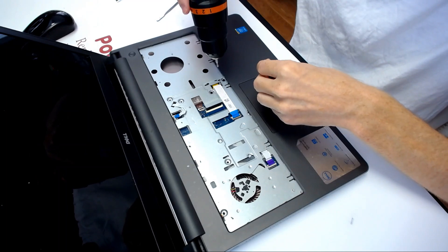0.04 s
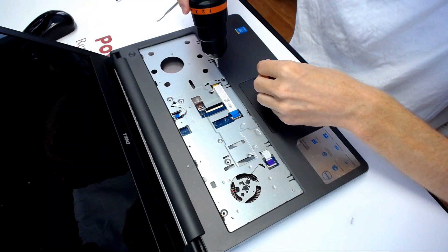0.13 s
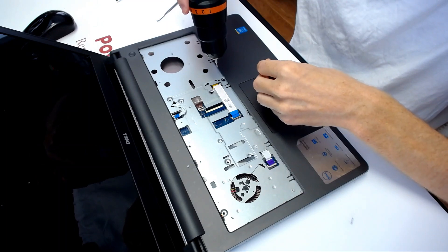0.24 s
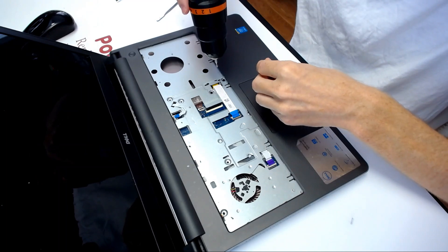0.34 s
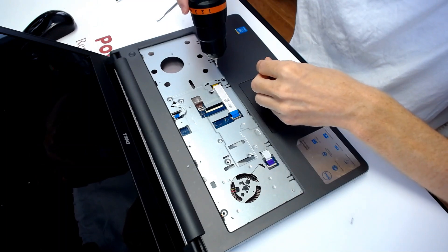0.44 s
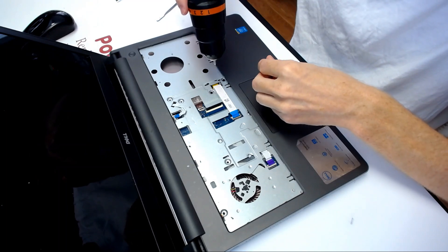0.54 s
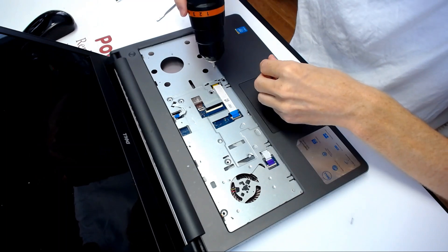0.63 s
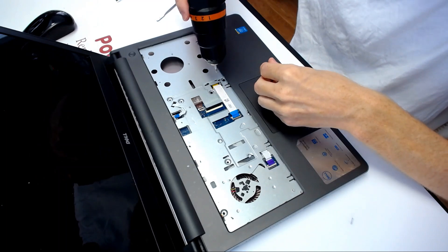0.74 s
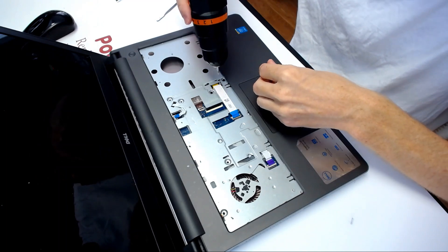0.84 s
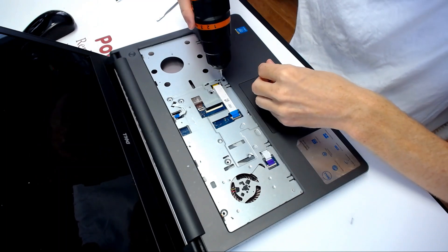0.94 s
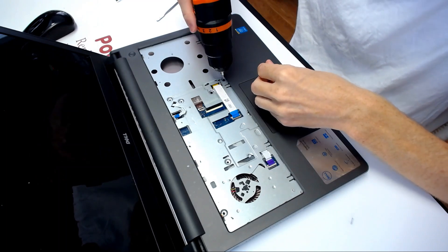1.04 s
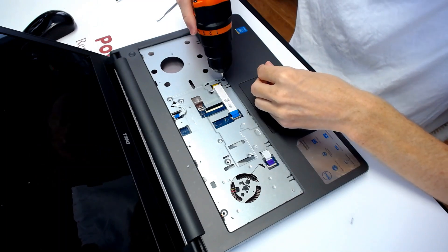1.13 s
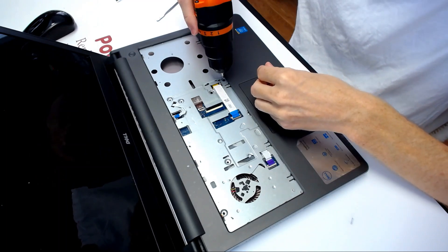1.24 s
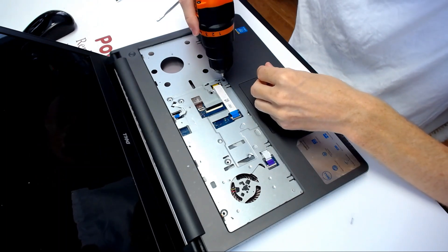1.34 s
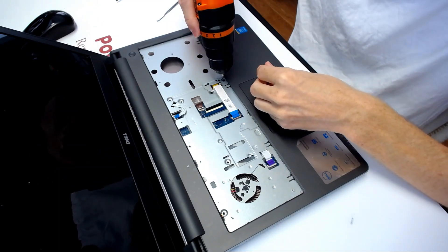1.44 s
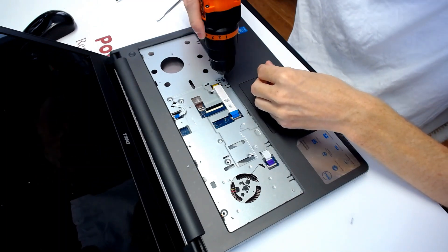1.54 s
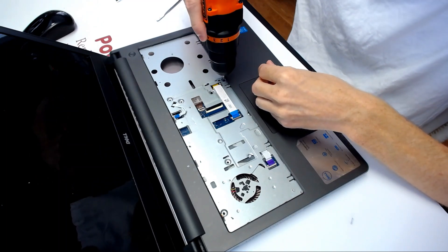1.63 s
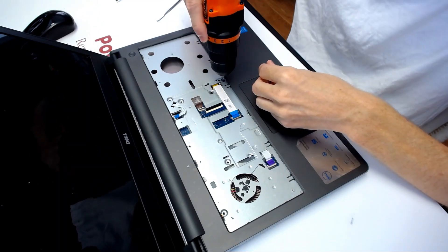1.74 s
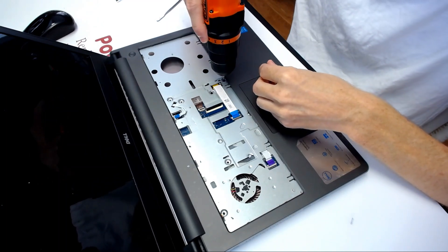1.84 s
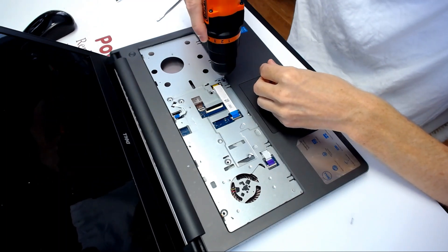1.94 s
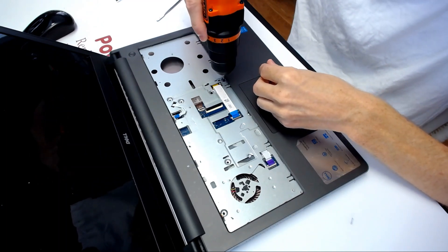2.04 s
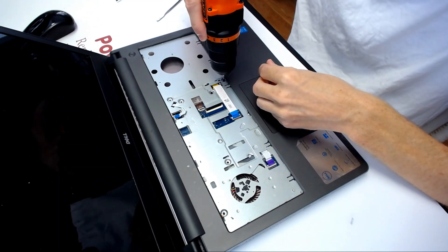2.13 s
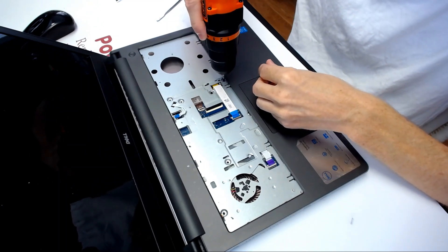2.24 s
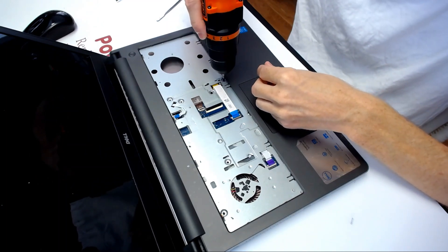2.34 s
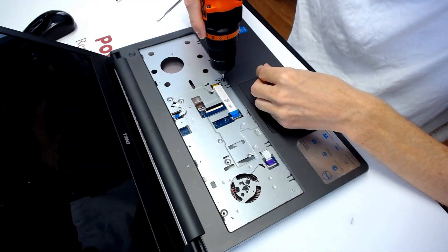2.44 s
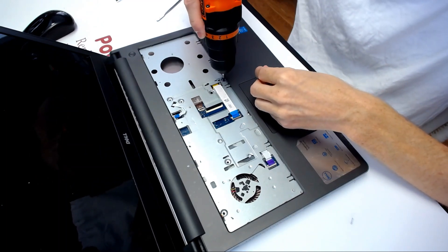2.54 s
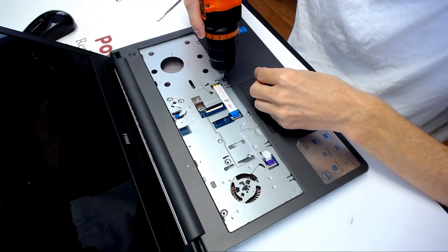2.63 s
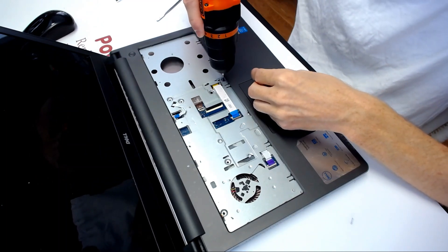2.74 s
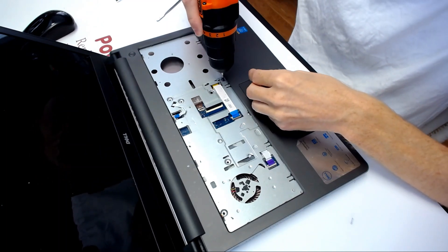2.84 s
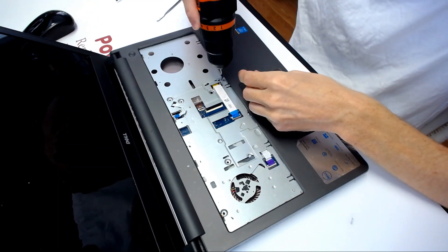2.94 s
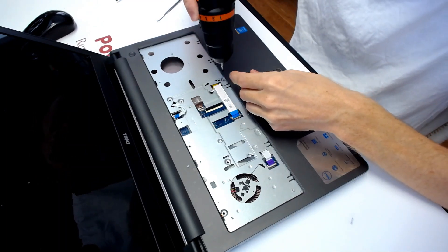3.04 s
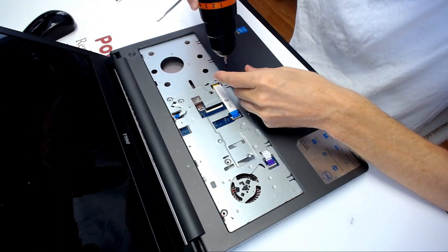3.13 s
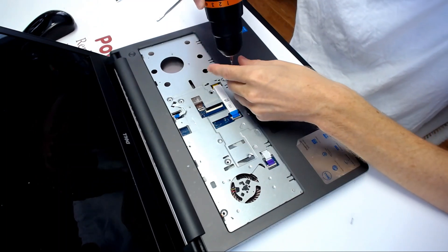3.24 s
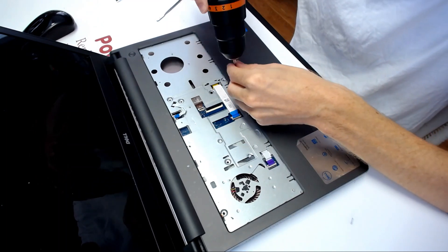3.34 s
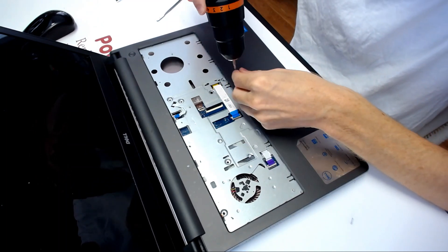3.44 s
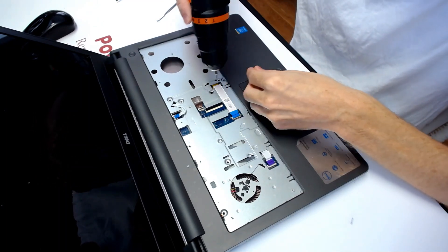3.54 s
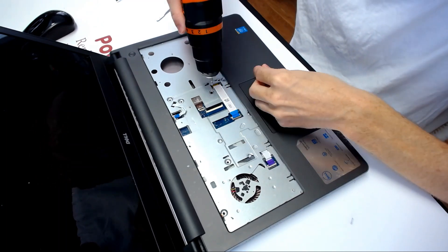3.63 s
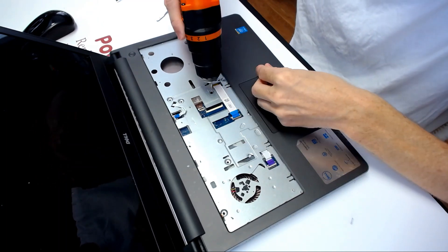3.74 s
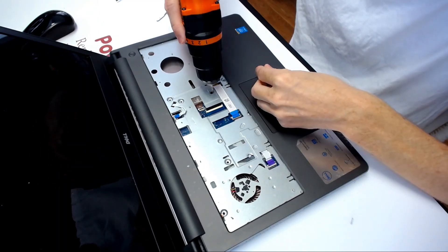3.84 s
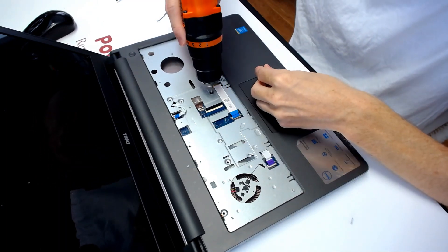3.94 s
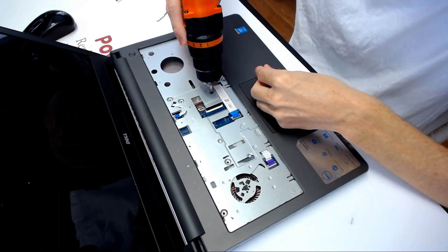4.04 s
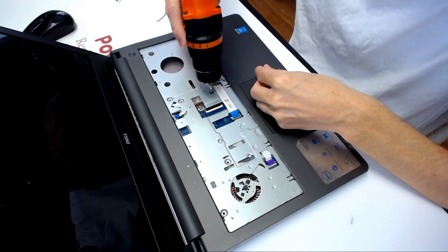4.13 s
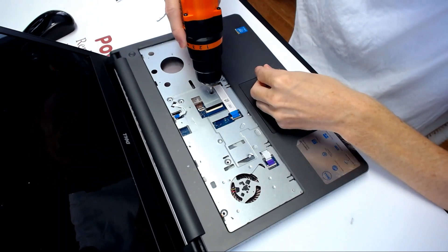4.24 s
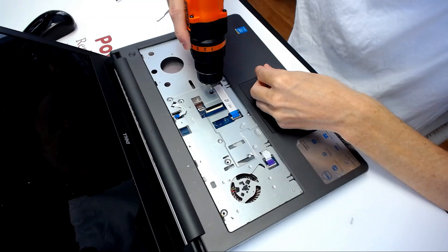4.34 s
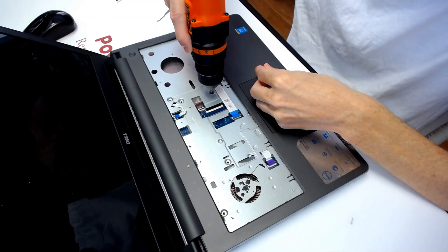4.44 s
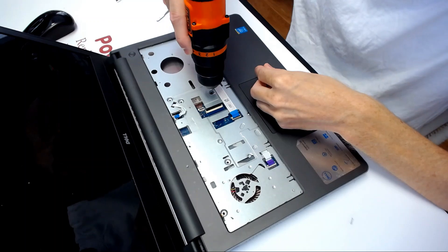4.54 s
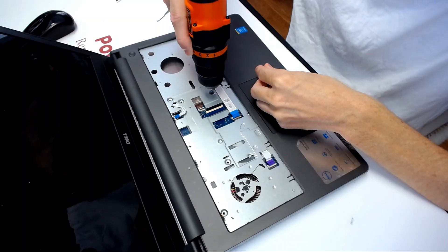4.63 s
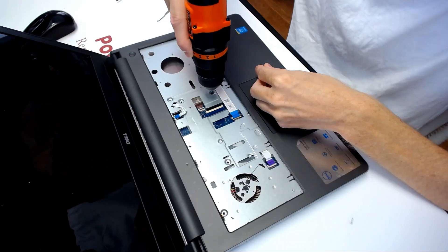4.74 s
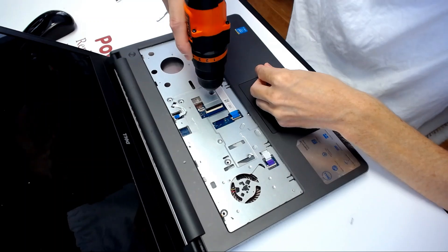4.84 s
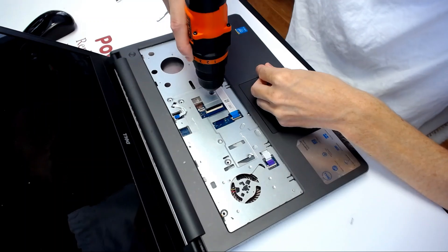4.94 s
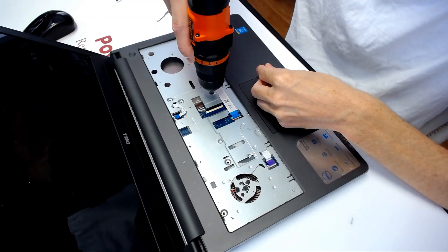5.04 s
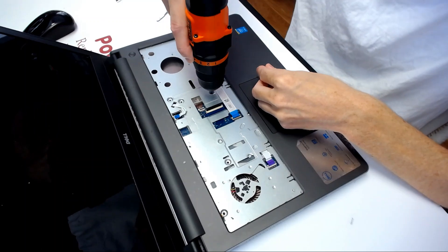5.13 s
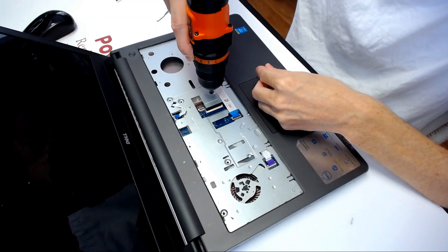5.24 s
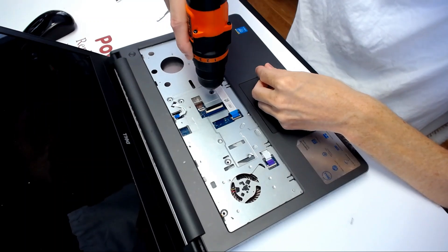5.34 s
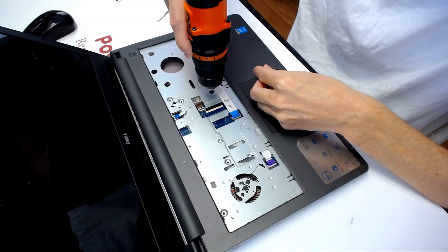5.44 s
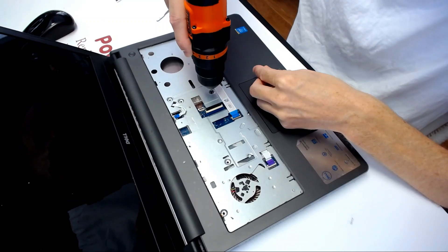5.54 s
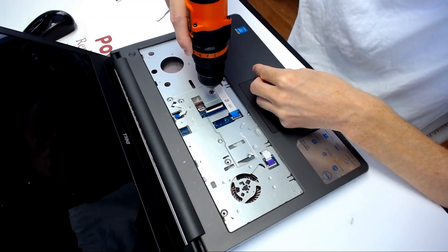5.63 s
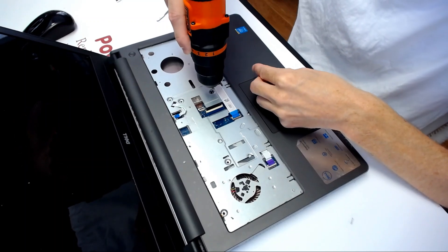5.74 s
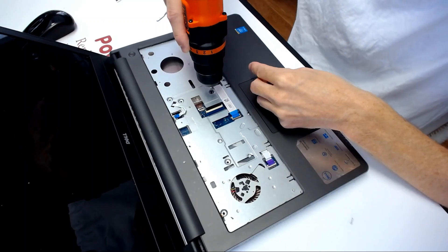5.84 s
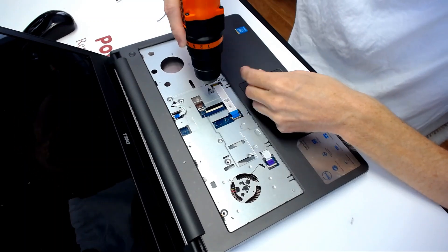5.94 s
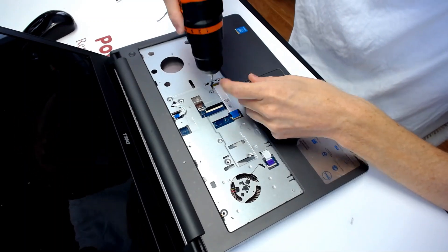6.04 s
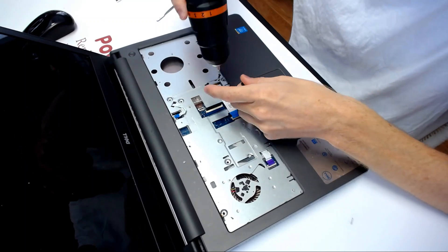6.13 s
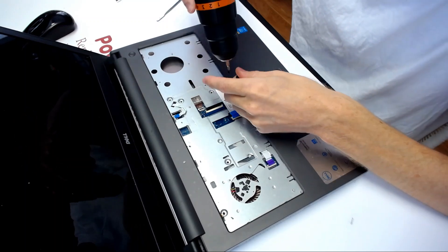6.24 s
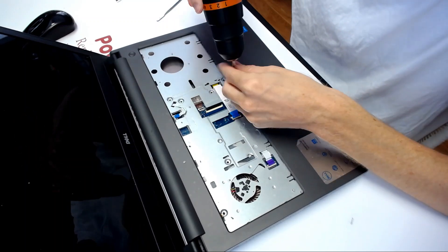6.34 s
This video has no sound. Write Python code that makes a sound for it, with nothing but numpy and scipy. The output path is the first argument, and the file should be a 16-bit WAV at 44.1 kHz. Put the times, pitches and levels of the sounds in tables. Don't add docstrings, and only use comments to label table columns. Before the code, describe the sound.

Close, quiet room: a bit knocks on sheet metal, a drill whirs and coasts down, then restarts with a harsh rapid clatter before whining smoothly.

```python
import sys
import numpy as np
from scipy import signal
from scipy.fft import rfft, irfft, next_fast_len
from scipy.io import wavfile
from scipy.ndimage import uniform_filter1d

SR = 44100
rng = np.random.default_rng(int(sys.argv[2]) if len(sys.argv) > 2 else 0)


def waveform_to_disk(signal):
    frames = np.transpose(np.atleast_2d(signal))
    scaled = np.clip(frames, -1, 1) * 32767
    samples = np.round(scaled).astype(np.int16)
    wavfile.write(sys.argv[1], SR, samples)


def ratio(d):
    e = np.asarray(d, float) / 20
    return 10 ** e


N = 281799
T = np.arange(N) / SR
SIZE = next_fast_len(N + SR)
HZ = np.maximum(np.arange(SIZE // 2 + 1) * SR / SIZE, 1)

# rotor starts in s, released in s, top speed in Hz, spin-up time in s.
PULLS = [
    (1.558, 3.006, 403.4, .117),
    (4.35, 6.019, 406.2, .085),
]
# time in s, peak in dB.
TRIGGER = [
    (1.588, -22.5),
    (4.37, -22.5),
]
# time in s, level in dB.
BITE = [(1.642, -70), (1.65, -28), (1.67, -25), (1.68, -70)]
# time in s, share 0 to 1.
JUMPING = [(4.53, 0), (4.56, 1), (4.885, 1), (4.9, 0)]
# centre in Hz, width in Hz, level in dB.
FRAME = [(271, 61, -4), (387, 12.7, 1.5), (607, 200, -7), (789, 43.5, 5.5), (901, 131, 0), (1340, 193, 1),
         (1439, 108, 3), (1730, 143, 3), (1879, 98, 4.5), (2460, 700, -1), (2920, 140, -11),
         (3480, 98, -14)]


def rms_one(x):
    return x / np.sqrt(np.mean(x ** 2) + 1e-20)


def to_db(gain):
    return 20 * np.log10(gain + 1e-9)


def over_time(points):
    return np.interp(T, *np.transpose(points))


def at_hz(points, hz=HZ):
    points = np.array(points)
    return np.interp(np.log(hz), np.log(points[:, 0]), points[:, 1])


def through(x, response):
    return irfft(rfft(x, SIZE) * response, SIZE)[..., :N]


def resonances(peaks):
    total = 0
    for k, (hz, width, db) in enumerate(peaks):
        damping = 1j * HZ * width
        total = total + (-1) ** k * ratio(db) * damping / (hz ** 2 - HZ ** 2 + damping)
    return total


def hump(hz, centre, width):
    return 1 / (1 + (2 * (hz - centre) / width) ** 2)


def drift(rate):
    r = np.exp(-80 * np.pi * rate / SR)
    slow = signal.lfilter([1], [1, -2 * r, r * r], rng.standard_normal(N // 40 + 2002))[2000:]
    return np.interp(np.arange(N) / 40, np.arange(len(slow)), rms_one(slow))


def noise_pair():
    return rng.standard_normal((2, N))


def pair(mid, side, response):
    # frequency in Hz, likeness of left and right 0 to 1.
    likeness = [(60, 1), (600, .95), (1600, .75), (3200, .5), (5000, .35), (7500, .75), (11000, .7),
                (15000, .5)]
    alike = np.clip(at_hz(likeness), 0, 1)
    both = through(mid, response * np.sqrt(1 + alike))
    apart = through(side, response * np.sqrt(1 - alike))
    return np.array([both + apart, both - apart]) / np.sqrt(2)


def clicks(times, level_db):
    out = np.zeros(N)
    out[(np.asarray(times) * SR).astype(int)] = ratio(level_db)
    return out


def burst(train, t60, low_hz, high_hz):
    fade = signal.lfilter([1], [1, -ratio(-60 / (t60 * SR))], train + 1e-18)
    band = signal.butter(2, [low_hz, high_hz], "band", fs=SR, output="sos")
    return signal.sosfilt(band, fade * noise_pair())


def air():
    # frequency in Hz, level in dB per Hz.
    noise_colour = [(12, -35), (25, -4), (55, -7.5), (100, -10), (170, -9.5), (320, -11), (570, -17),
                    (1420, -28.5), (1700, -33), (11000, -45), (15000, -37)]
    # frequency in Hz, level in dB.
    hums = [(59.2, -72.5), (156.1, -88.5), (624.5, -79.5), (710.6, -84), (1437, -86), (7192, -102)]
    out = rms_one(pair(*noise_pair(), ratio(at_hz(noise_colour)))) * ratio(-64 + 0.77 * drift(10))
    for hz, db in hums:
        out = out + np.sqrt(2) * ratio(db + 0.5 * drift(4.4)) * np.sin(2 * np.pi * hz * T)
    return out


def room(x):
    t60_s, first_return_s = 0.28, 0.004
    t = T[:SR // 2]
    tail = rng.standard_normal((2, SR // 2)) * ratio(-60 * t / t60_s) * (t > first_return_s)
    tail = tail / np.sqrt(np.sum(tail ** 2, axis=1, keepdims=True))
    return through(x, rfft(tail, SIZE) / (1 + HZ / 5000) * HZ / (HZ + 300))


def knocks():
    # time in s, peak in dB, thud in dB, crack in dB.
    hits_on_frame = [(1.128, -28, -31.5, -49), (1.296, -65, -51, -77), (1.331, -69, -57, -72),
                     (1.46, -71, -70, -74), (1.505, -69, -69.5, -73), (1.622, -15, -25, -42),
                     (1.632, -22, -18.5, -37), (2.511, -31, -45, -25), (2.531, -21.5, -52, -28),
                     (2.689, -25.5, -30.5, -37), (2.712, -27.5, -42, -40), (3.935, -19, -40, -51),
                     (3.985, -34.5, -47, -54), (4.025, -29.5, -67.5, -58.5), (4.109, -37, -41, -72.5),
                     (4.154, -41, -43.5, -62), (5.737, -20, -55, -44), (5.749, -30, -35, -30)]
    s, peak_db, thud_db, crack_db = np.transpose(hits_on_frame)
    hits = clicks(s, peak_db + 10.5)
    blow = np.convolve(hits, np.hanning(24))[:N]
    contact = burst(hits, 0.025, 400, 1500) - blow * [[1], [.3]]
    thud = burst(clicks(s, thud_db + 12), 0.13, 110, 475)
    crack = burst(clicks(s, crack_db + 8.5), 0.028, 1700, 7000)
    switch = burst(clicks(*np.transpose(TRIGGER)), 0.02, 1600, 5950)
    return pair(*contact, ratio(-15.5) + resonances(FRAME)) + pair(*(thud + crack + ratio(8) * switch), 0.94)


def jumps():
    # time in s, peak in dB, crack in dB relative to the peak.
    drops = [(4.452, -8.5, -16), (4.486, -3, -29), (4.501, -7, -8), (4.549, -6.5, -25), (4.571, 0.5, -17),
             (4.579, -6, -9), (4.602, 1, -13.5), (4.622, -4.5, -28), (4.646, -7.5, -21),
             (4.671, -12.5, -29), (4.692, -5, -23), (4.714, -11, -16), (4.737, -25, -21),
             (4.763, -6.5, -13), (4.786, 0, -9.5), (4.81, -1.5, -7), (4.833, -2, -8.5), (4.856, 1, -23),
             (4.879, -2, -6.5), (4.887, -7, -0.5)]
    s, peak_db, bright_db = np.transpose(drops)
    hits = clicks(s, peak_db + 4.5)
    blow = np.convolve(hits, np.hanning(16))[:N]
    contact = burst(hits, 0.022, 300, 3500) - ratio(1) * blow * [[1], [.4]]
    crack = burst(clicks(s, peak_db + bright_db + 3), 0.025, 2500, 7000)
    return pair(*contact, ratio(-15) + resonances(FRAME)) + pair(*crack, 0.94)


def jolted(steady_db, times, peaks_db, fade_db_s):
    dying = signal.lfilter([1], [1, -ratio(-fade_db_s / SR)], clicks(times, peaks_db) + 1e-18)
    return to_db(ratio(steady_db) + dying)


def rub_and_shake(rub_db, rattle_db):
    # time in s, rubbing in dB, bench in dB.
    jolts = [(1.129, -47.5, -47), (1.297, -72, -51), (1.39, -90, -61), (1.619, -33, -37), (2.13, -44, -58),
             (2.512, -31.5, -41), (2.686, -48, -39.5), (3.937, -43.5, -39), (4.109, -60.5, -47.5),
             (4.155, -63, -46.5), (4.9, -26, -38), (5.737, -33.5, -45)]
    s, rub_jolts_db, shake_jolts_db = np.transpose(jolts)
    heavy = np.clip((rub_db + 40) / 10, 0, 1)
    off_screw = rattle_db < -31
    shake_db = rub_db - 18.5 + 18.5 * heavy - 10 * off_screw
    return jolted(rub_db, s, rub_jolts_db, 358), jolted(shake_db, s, shake_jolts_db, 115)


def rubbing(rub_db, shake_db):
    slot_hz, dip_s = 42.7, 4.7525
    slot = 2 * np.pi * slot_hz * (T - dip_s) + 0.071 * drift(22)
    jumping = over_time(JUMPING)
    swell = 1 + 0.45 * jumping * np.cos(slot + 2.3)
    grit = noise_pair() * ratio(2 * drift(47)) * swell
    frame = rms_one(pair(*grit, ratio(-13) / (1 + HZ / 3000) + resonances(FRAME)))
    bench_modes = resonances([(44.8, 61, 3.5), (131, 37, 3)])
    bench = rms_one(pair(*noise_pair(), bench_modes / (1 + (HZ / 300) ** 2)))
    harmonics_db = [3, 0.5, -4.5, -35, -8.5]
    dips = -sum(ratio(db) * np.cos(k * slot) for k, db in enumerate(harmonics_db, start=1))
    shake = (1 - 0.7 * jumping) * bench + jumping * dips
    return ratio(rub_db + 4) * frame + ratio(shake_db - 4.5) * shake


def rotor_speed():
    # from s, until s, sag in Hz, easing time in s.
    loads = [(1.5, 1.678, 17, 0.01606), (4.3, 4.94, 18.5, .36)]
    coast_per_s, friction_hz = 0.68, 296.2
    sag = 0
    for since, until, hz, eases in loads:
        sag = sag + hz * np.exp(-np.maximum(T - until, 0) / eases) * (T > since)
    speed = np.zeros(N)
    for (start, stop, top, rise), (click, _) in zip(PULLS, TRIGGER):
        driven = top * (1 - np.exp(-np.maximum(T - start, 0) / rise)) - sag
        dying = np.exp(-coast_per_s * np.maximum(T - stop, 0))
        coast = (top + friction_hz) * dying - friction_hz
        speed = np.where(T > click - 0.003, np.clip(np.minimum(driven, coast), 0, None), speed)
    return speed


def slowness(speed):
    return np.clip((396 - speed) / 30, 0, 1)


def leaning(speed):
    # time in s, slack at first in dB, then gear rattle, low tones, rubbing in dB.
    leans = [(1.13, 2, -93, -110, -86), (1.588, -1, -38.5, -65, -40.5), (1.613, 10, -20, -38, -29),
             (1.677, 19.5, -24.5, -41, -44.5), (1.897, 3.5, -25.5, -47.5, -52),
             (2.032, 1, -23, -37.5, -49.5), (2.231, 7.5, -24.5, -39.5, -64), (2.38, 0.5, -23.5, -37, -47),
             (2.585, 9, -24, -35, -45.5), (2.7, 1.5, -23.5, -34.5, -41.5), (2.798, 5, -25.5, -37.5, -51.5),
             (2.934, -0.4, -32.5, -44, -50.5), (4.365, 16, -23, -45, -24), (4.505, 1.8, -31, -39, -26),
             (4.549, 3, -23, -33.5, -21), (4.902, 0.3, -26, -52, -40.5), (4.99, 3, -21.5, -46, -38),
             (5.187, 5.5, -22, -45, -49.5), (5.33, 1, -23, -41, -51), (5.429, 1.5, -22.5, -34.5, -43.5),
             (5.733, 10, -28.5, -33, -46), (5.868, 0.8, -32, -43.5, -51)]
    # rotor speed in Hz, rattle in dB, rubbing in dB.
    coasting = [(0.1, -52, -28), (18, -41, -18), (45, -25, -6), (84.2, -17.5, -4), (123, -13, 0.5),
                (195, -12.5, -7), (310, -6.5, -1.5), (393, 0.2, 0.5)]
    rows = np.vstack([(0, 0, -120, -120, -120), leans])
    s, slack, rattle, tone, rub = rows[np.searchsorted(rows[:, 0], T, side="right") - 1].T
    next_pulls = [TRIGGER[1][0] - 0.003, T[-1] + 1]
    free = sum((T > stop) & (T < later) for (_, stop, *_), later in zip(PULLS, next_pulls))
    hz, *fades = np.transpose(coasting)
    fade, rub_fade = (free * np.interp(speed, hz, f) for f in fades)
    loose = slack * np.exp((s - T) / 0.047)
    tone_loose = 1.36 * slack * np.exp((s - T) / 0.13)
    levels = [rattle - loose + fade, tone - tone_loose + 3.24 * fade, rub - 1.43 * loose + rub_fade]
    return uniform_filter1d(levels, size=440, axis=1)


def screw_wobble():
    start, crest, stop, beats_per_s = 4.988, 5.025, 5.185, 14.3
    fading = ratio(-28 - 27 * (T - start).clip(0)) * ((T > start) & (T < stop))
    return fading * np.clip(0.83 + np.cos(2 * np.pi * beats_per_s * (T - crest)), 0.05, 1)


def tones(speed, rattle_db, low_db, jumping):
    # centre in Hz, width in Hz, dB against the rattle.
    cry_x1, cry_x3, cry_x6 = [(234, 83, -19.5)], [(470, 220, -3.5), (660, 53, -18)], [(725, 210, 3), (1810, 260, -10),
                                                              (2270, 280, -17)]
    slow, gain_of_speed = slowness(speed), np.gradient(speed)

    def cry(peaks, hz):
        ring = sum(ratio(rattle_db + db) * hump(hz, at, width) ** 2 for at, width, db in peaks)
        return slow * (gain_of_speed < 0) * ring

    x1 = ratio(low_db) + screw_wobble() + cry(cry_x1, speed)
    spin_up_db = 6.5 * slow * (gain_of_speed > 0)
    x3 = ratio(low_db + spin_up_db) + cry(cry_x3, 3 * speed) + ratio(over_time(BITE) - 2)
    follows_db = 0.24 * np.clip(low_db - rattle_db + 12, -20, 5)
    x6_db = rattle_db - 6 * slow + 2 * jumping - 9.5 + follows_db
    x6 = ratio(x6_db) + cry(cry_x6, 6 * speed)
    off_screw = np.clip((-26 - rattle_db) / 6, 0, 1)
    mesh_slow = np.clip((364 - speed) / 45, 0, 1)
    mesh_db = rattle_db - 12.5 - 5 * off_screw - 17.5 * mesh_slow - 7 * jumping
    return [to_db(x1), to_db(x3), to_db(x6), mesh_db]


def sheen_level(speed, jumping):
    return -10 + 3.5 * (1 - speed / PULLS[0][2]) - 7 * jumping + 3.5 * hump(speed, 94, 56)


def gears(turns, rattle_db, sheen_db):
    # centre in Hz, width in Hz, level in dB.
    housing = [(1950, 450, -7), (2350, 300, -9), (3100, 350, -4), (3440, 340, 0), (4120, 350, -4),
               (4400, 380, -1), (5000, 300, -6), (6050, 300, -9), (6470, 350, -9), (8400, 700, -10),
               (9500, 600, -12)]
    # frequency in Hz, level in dB.
    gear_colour = [(110, -27), (300, -8.5), (900, -10.5), (1500, -5), (2000, 2), (7000, 1.5), (10000, -1),
                   (12000, -1.5), (15500, -24)]
    speed = np.gradient(turns) * SR
    rotor_bunch = 1 + 0.17 * np.cos(2 * np.pi * turns)
    carrier_bunch = 1 + 0.15 * np.cos(2 * np.pi * 0.44 * turns)
    bunch = rotor_bunch * carrier_bunch * ratio(1.36 * drift(66))
    touch = rng.random((2, N)) < 22 * speed / SR
    sizes = ratio(3.2 * np.minimum(rng.exponential(1, (2, N)), 4)) * rng.choice([-1, 1], (2, N))
    teeth = bunch * (touch * sizes / np.sqrt(0.2 + speed / 400) + 0.54 * noise_pair())
    humps = sum(ratio(2 * db) * hump(HZ, hz, width) ** 2 for hz, width, db in housing)
    colour = ratio(at_hz(gear_colour)) * np.sqrt(ratio(-29) + humps)
    vents = 1 / (1 + (7200 / HZ) ** 12)
    body = pair(*teeth, colour * (1 - vents))
    sheen = pair(*teeth, colour * vents)
    return ratio(rattle_db) * (rms_one(body) + ratio(sheen_db - 0.5) * rms_one(sheen))


def motor(turns, levels_db, rattle_db):
    # multiple of rotor speed, dB against the rattle.
    upper_slots = [(3, -34), (6, -24), (9, -20), (12, -14), (15, -14), (18, -16), (21, -19)]
    # multiple of rotor speed, dB against the rattle.
    side_orders = [(4, -22), (5, -49)]
    shell = (0.5 + np.abs(resonances(FRAME))) / (1 + (HZ / 5000) ** 2)
    speed = np.gradient(turns) * SR
    slow = slowness(speed)
    slowing = slow * (np.gradient(speed) < -1e-4) * np.clip((speed - 62) / 15, 0, 1)
    slowing = slowing * ratio(-4.5 * (speed - 150) / 100)
    gains = dict(zip((1, 3, 6, 15), ratio(levels_db)))
    for k, db in upper_slots:
        swept = ratio(rattle_db + db + 5 * drift(9)) * np.interp(k * speed, HZ, shell)
        gains[k] = gains.get(k, 0) + slowing * swept
    gains[9] += ratio(over_time(BITE))
    for k, db in side_orders:
        gains[k] = (1 - slow) * ratio(rattle_db + db)
    out = np.zeros((2, N))
    for k, gain in gains.items():
        phase = 2 * np.pi * k * turns + 0.012 * k * drift(44)
        lag = 0.16 * drift(25)
        out += np.sqrt(2) * gain * ratio(1.54 * drift(29)) * np.sin([phase + lag, phase - lag])
    return out


def placed(near):
    # frequency in Hz, left minus right in dB.
    side_colour = [(60, 3.5), (130, 0.5), (290, 4), (640, 2), (1410, 0), (3100, 2.5), (6820, -1),
                   (15000, -1)]
    # frequency in Hz, radians by which left leads.
    side_lead = [(700, 0), (1400, 0.92), (3800, 0.37), (5600, 0.65)]
    # time in s, left minus right in dB.
    side_drift = [(0, -1), (4.9, -2), (5.3, -2), (5.8, -2.5)]
    halves = np.array([[.5], [-.5]])
    near = through(near, ratio(at_hz(side_colour) * halves) * np.exp(1j * at_hz(side_lead) * halves))
    return near * ratio(over_time(side_drift) * halves)


def scene():
    speed, jumping = rotor_speed(), over_time(JUMPING)
    turns = np.cumsum(speed) / SR
    rattle_db, low_db, rub_db = leaning(speed)
    near = rubbing(*rub_and_shake(rub_db, rattle_db)) + knocks() + jumps()
    near = near + gears(turns, rattle_db, sheen_level(speed, jumping))
    near = near + motor(turns, tones(speed, rattle_db, low_db, jumping), rattle_db)
    near = placed(near)
    return near + ratio(-12) * room(near.mean(axis=0)) + air()


def top_cut(x):
    return signal.sosfilt(signal.butter(12, 15820, fs=SR, output="sos"), x)


def record(dry):
    # frequency in Hz, microphone gain in dB.
    mic_gain = [(20, -1), (9500, 1.5), (11500, -7.5), (13000, -14), (15800, -22)]
    rounded = 1.229 * np.tanh(dry / 1.367)
    mix = through(rounded, ratio(at_hz(mic_gain)))
    return top_cut(mix)


dry = scene()
out = record(dry)
waveform_to_disk(out)
```